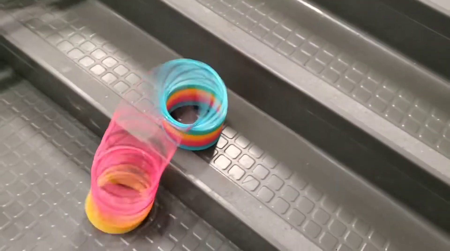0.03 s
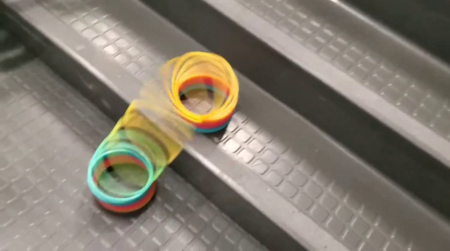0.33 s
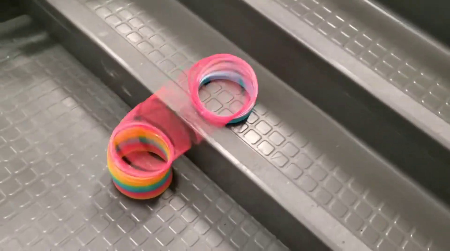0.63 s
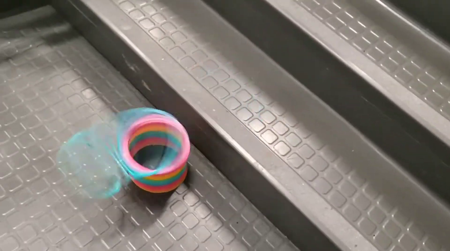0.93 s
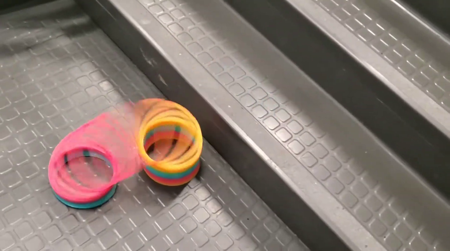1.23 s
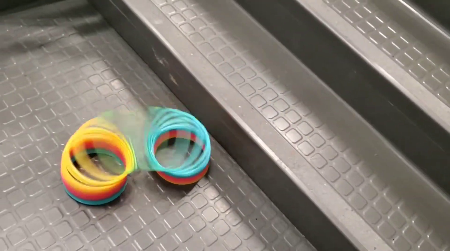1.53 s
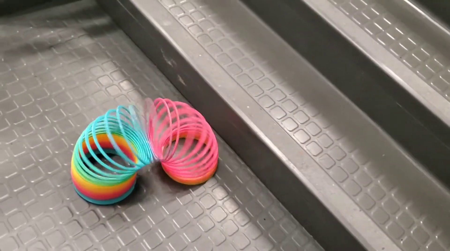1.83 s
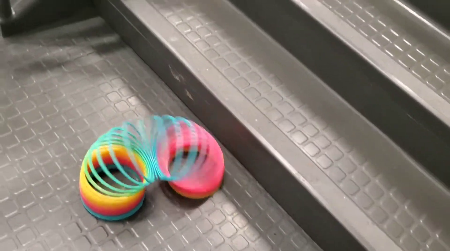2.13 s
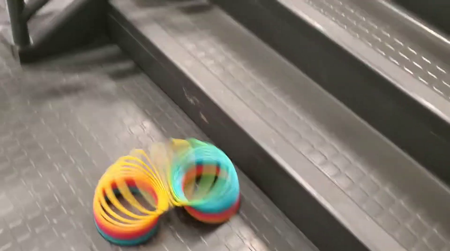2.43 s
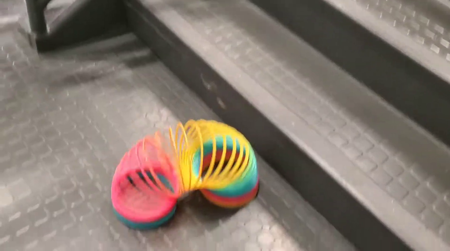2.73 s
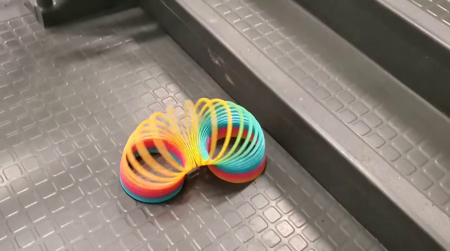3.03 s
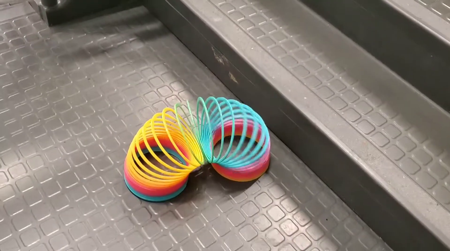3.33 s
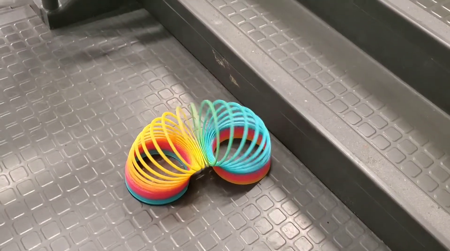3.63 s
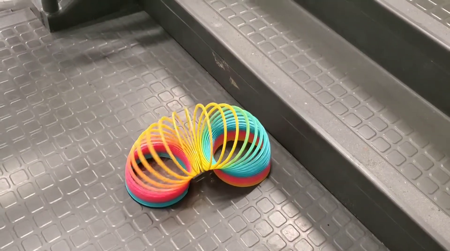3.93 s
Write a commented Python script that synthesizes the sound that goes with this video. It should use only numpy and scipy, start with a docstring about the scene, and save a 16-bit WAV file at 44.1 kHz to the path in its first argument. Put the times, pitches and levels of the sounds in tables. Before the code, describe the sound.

A plastic coil toy flips down hard steps close by, with bright rustling and quick clacks. It slows, gives a sharp knock and shivers twice before resting. The stairwell echoes briefly over a low building rumble.

```python
"""Stairwell: a large plastic coil toy flips down the last hard steps, close by, and rocks to rest.
Its turns peel off one stack with a bright rustle and clack onto the other one by one; lower down the
whole coil rattles, clops and thuds on the treads. A sharp knock, two last shivers. The stairwell rings
briefly over a low building rumble with a faint hum and one soft boom near the end."""
import sys
import numpy as np
from scipy import signal
from scipy.fft import rfft, irfft
from scipy.io import wavfile
from scipy.ndimage import uniform_filter1d, map_coordinates

SR = 44100
rng = np.random.default_rng(int(sys.argv[2]) if len(sys.argv) > 2 else 0)


def bounce(signal):
    """Save signal as a 16-bit WAV file at the path given by the first command-line argument."""
    frames = np.transpose(np.atleast_2d(signal))
    limited = np.clip(frames, -1, 1)
    pcm = np.round(limited * 32767).astype(np.int16)
    wavfile.write(sys.argv[1], SR, pcm)


N = 176400
TIME_S = np.arange(N) / SR


def undb(db):
    """Decibels to gain."""
    return 10 ** (np.asarray(db) / 20)


def unit(x):
    """Scale to rms 1."""
    return x / np.sqrt(np.mean(x ** 2) + 1e-20)


def curve(table, at=TIME_S):
    """Linear interpolation of a two-column table, by default over time."""
    return np.interp(at, *np.array(table).T)


def over_hz(table, size):
    """Interpolate (freq_hz, value) rows onto FFT bins, in log frequency."""
    hz, value = np.array(table).T
    return np.interp(np.log(np.fft.rfftfreq(size, 1 / SR) + 1), np.log(hz), value)


def min_phase(gain_db):
    """Causal, unit-power impulse response from 1025 bin gains."""
    cepstrum = irfft(np.log(unit(undb(gain_db))))
    cepstrum[1:1024] *= 2
    cepstrum[1025:] = 0
    return irfft(np.exp(rfft(cepstrum)))[None]


def colour(x, table):
    """Filter by (freq_hz, gain_db) rows; white input keeps its power."""
    return signal.fftconvolve(x, min_phase(over_hz(table, 2048)), axes=1)[:, :N]


def wander(size, step):
    """Smooth random curve, rms 1, one knot every step points."""
    knots = rng.standard_normal(4096)
    return unit(map_coordinates(knots, [np.arange(size) / step], order=2, mode="mirror"))


def pulse(centre_s, sigma_s):
    """Gaussian envelope, peak 1."""
    return np.exp(-.5 * ((TIME_S - centre_s) / sigma_s) ** 2)


def pan(db):
    """Stereo gains; db is left minus right."""
    return unit(undb(np.array([[db], [-db]]) / 2))


def stereo_noise(size, correlation=.12):
    """White noise, partly shared by left and right."""
    noise = rng.standard_normal((3, size))
    return np.sqrt(correlation) * noise[0] + np.sqrt(1 - correlation) * noise[1:]


def grains(per_s, spread_db):
    """Tiny contacts of unequal size at random moments."""
    happens = rng.random(N) < per_s / SR
    gain = undb(spread_db * np.clip(rng.standard_normal(N), -2, 2))
    return unit(happens * gain * np.tanh(stereo_noise(N)))


def resonance(x, hz, width_hz):
    """Band-pass, gain 1 at the centre."""
    return signal.lfilter(*signal.iirpeak(hz, hz / width_hz, fs=SR), x + 1e-18)


def add(out, start_s, sound):
    """Mix a sound in at start_s."""
    i = int(np.clip(round(start_s * SR), 0, N - 1))
    out[:, i:i + sound.shape[1]] += sound[:, :N - i]


def building():
    """Low rumble that swells late, a faint mains hum and one soft boom."""
    # freq_hz, density_db
    spectrum = [(20, -20), (32, -17.5), (45, -2), (63, 0), (85, -5), (120, -11.5), (160, -11.5),
                (250, -14.5), (400, -19.5), (600, -22.5), (950, -31.5), (1700, -32.5), (2300, -36),
                (3500, -38), (6000, -42.5), (10000, -51.5), (15500, -61)]
    # freq_hz, left_right_correlation
    likeness = [(30, .98), (63, .95), (125, .86), (250, .78), (500, .5), (1000, .15), (4000, .05)]
    # time_s, gain_db
    swell = [(0, -1.5), (.9, -1), (1.2, 0), (2, -1.5), (2.7, 0.5), (3.3, 0.5), (3.6, 3), (3.8, 3.5), (4, 2)]
    shared = over_hz(likeness, N)
    noise = rfft(rng.standard_normal((3, N)))
    noise = np.sqrt(shared) * noise[0] + np.sqrt(1 - shared) * noise[1:]
    rumble = unit(irfft(noise * undb(over_hz(spectrum, N)))) * undb(curve(swell) - 40.5)
    boom_hz, hum_hz = 64.3, 119.3
    drift_rad = 1.1 * wander(N, SR / 25)
    boom = np.sin(2 * np.pi * boom_hz * TIME_S + drift_rad) * pulse(centre_s=3.78, sigma_s=.065)
    hum = np.sin(2 * np.pi * hum_hz * TIME_S)
    return rumble + np.sqrt(2) * (undb(-33) * boom + undb(-52.5) * hum)


def slide():
    """Edges of the turns catch and slip in a fluttering rustle."""
    # time_s, level_db
    envelope = [(0, -44), (.045, -43), (.08, -26.5), (.13, -24), (.25, -28), (.295, -30.5), (.325, -26.5),
                (.37, -28), (.415, -31), (.48, -26.5), (.55, -29.5), (.61, -26.5), (.78, -29), (.9, -34),
                (.97, -44), (1.0, -43), (1.075, -44), (1.12, -31), (1.2, -26.5), (1.3, -29), (1.37, -33),
                (1.45, -32.5), (1.55, -42), (1.69, -44), (1.78, -50), (1.9, -59.5), (2.025, -57),
                (2.07, -35), (2.14, -28), (2.22, -36.5), (2.29, -38), (2.335, -47), (2.44, -46),
                (2.53, -63), (2.7, -59), (2.8, -62), (2.898, -61), (2.93, -32.5), (2.965, -32.5),
                (3.012, -39), (3.04, -49), (3.1, -72), (3.555, -83), (3.575, -37), (3.607, -49),
                (3.63, -70), (4, -90)]
    # freq_hz, gain_db
    spectrum = [(500, -35), (1500, -18.5), (2500, -12.5), (3300, -8.5), (4200, -8.5), (5500, -5.5),
                (7500, -7.5), (9600, -4), (12000, -5.5), (14000, -2.5), (15500, -2)]
    flutter_db, flutter_per_s = 2.5, 150
    flutter = unit(undb(flutter_db * wander(N, SR / flutter_per_s)))
    contacts = grains(per_s=5000, spread_db=3.5) * flutter * undb(curve(envelope))
    return colour(contacts, spectrum) * pan(db=3)


def rattle():
    """Heavier jolts shake the whole coil."""
    # time_s, level_db
    envelope = [(0, -45), (.05, -55), (.12, -45), (.27, -41), (.33, -43.5), (.42, -45), (.48, -39),
                (.54, -46), (.63, -38.5), (.8, -45.5), (.92, -47), (.98, -68), (1.08, -60), (1.15, -48),
                (1.27, -40.5), (1.45, -43.5), (1.58, -52.5), (1.7, -42.5), (1.85, -67), (2.02, -67),
                (2.14, -42.5), (2.26, -50), (2.44, -52), (2.6, -59), (2.89, -64), (2.96, -38.5),
                (3.015, -50), (3.06, -72), (3.55, -85), (3.578, -42), (3.61, -47.5), (3.64, -78), (4, -90)]
    # freq_hz, gain_db
    spectrum = [(150, -11), (400, -6.5), (750, 1), (1000, 0), (1600, -1.5), (2500, -1.5), (3400, 4),
                (4300, -1), (5500, -11), (10000, -39)]
    jolts = grains(per_s=900, spread_db=4) * undb(curve(envelope) - 4.5)
    return colour(jolts, spectrum) * pan(db=1.5)


def coil_modes(x, ripple_db=1.3, width_hz=380, step_s=.07):
    """Crowded plastic resonances shift as the coil bends: cross-faded random filters."""
    out = np.zeros((2, N))
    for centre_s in np.arange(0, N / SR + step_s, step_s):
        response = min_phase(ripple_db * wander(1025, width_hz * 2048 / SR))
        fade = np.maximum(1 - abs(TIME_S - centre_s) / step_s, 0)
        near = np.flatnonzero(fade)
        if len(near):
            add(out, near[0] / SR, signal.fftconvolve(x[:, near] * fade[near], response, axes=1))
    return out


def brighten(x, above_hz=10500):
    """The top treble is keener in the flips, duller in the last shivers."""
    # time_s, gain_db
    treble = [(0, 1), (.45, 1), (.6, 1.5), (.8, -1), (1.05, 0), (1.25, 1), (1.65, 1), (1.9, -2.5),
              (2.1, -1.5), (2.5, 0), (2.75, -2), (3.0, -2.5), (3.6, -3.5)]
    top = signal.sosfiltfilt(signal.butter(3, above_hz, "high", fs=SR, output="sos"), x + 1e-18)
    return x + top * (undb(curve(treble)) - 1)


def hollow(x, blend_s=.04):
    """The bent tube of turns rings at three pitches that change with its pose."""
    # start_s, low_hz, middle_hz, high_hz
    poses = [(0, 1270, 1730, 2910), (.23, 1006, 1290, 1800), (.43, 730, 1630, 2410),
             (1.02, 1085, 1340, 1950), (1.52, 880, 1350, 1930), (2.02, 1320, 1680, 2220),
             (2.33, 900, 1130, 1910), (2.88, 985, 1500, 2640)]
    pose = np.searchsorted([row[0] for row in poses[1:]], TIME_S)
    out = x
    for k, (_, *pitches_hz) in enumerate(poses):
        part = x * uniform_filter1d(1. * (pose == k), int(blend_s * SR) + 1)
        out = out + undb(5.5) * sum(resonance(part, hz, width_hz=130) for hz in pitches_hz)
    return out


def clacks(size=1024):
    """Each turn slaps onto the stack in a quick crowd of ticks with its own tint."""
    # peak_s, level_db, pan_db, length_s
    slaps = [(0.02, -33, 2, 0.0011), (0.038, -43, 2, 0.001), (0.0586, -28.5, 2, 0.0019),
             (0.065, -27, 5, 0.0011), (0.076, -22, -1, 0.0029), (0.083, -22.5, 4, 0.0024),
             (0.09, -23.5, 5, 0.0024), (0.151, -18, 4, 0.0026), (0.167, -28, 5, 0.0013),
             (0.178, -24, -1, 0.002), (0.205, -25, 3, 0.0029), (0.221, -23.5, 8, 0.0018),
             (0.24, -20, 5, 0.0035), (0.26, -19.5, 3, 0.0018), (0.278, -28, 2, 0.0017),
             (0.3135, -24, 3, 0.0021), (0.357, -26, 1, 0.002), (0.3922, -33, 1, 0.0024),
             (0.4083, -22.5, -4, 0.002), (0.425, -33, 9, 0.0024), (0.448, -24, 2, 0.0023),
             (0.469, -26, 6, 0.0022), (0.487, -25, 1, 0.0022), (0.5571, -23.5, 5, 0.0022),
             (0.584, -26, 6, 0.001), (0.5994, -22.5, 1, 0.0027), (0.6421, -29, 5, 0.0016),
             (0.679, -29, 4, 0.0013), (0.69, -30, 1, 0.0014), (0.7156, -26, 5, 0.0012),
             (0.74, -25, 4, 0.0019), (0.766, -27, 1, 0.0014), (0.787, -22, 0, 0.0022),
             (0.809, -29, 6, 0.002), (0.815, -25, 2, 0.0013), (0.8607, -21.5, 4, 0.0021),
             (0.874, -25.5, 2, 0.0026), (0.9186, -28.5, 1, 0.0031), (0.946, -36, 5, 0.0024),
             (0.9873, -28.5, 9, 0.0013), (1.04, -39, 2, 0.0026), (1.06, -40, 6, 0.0019),
             (1.082, -32, 5, 0.0011), (1.099, -38, 3, 0.0012), (1.113, -30, 4, 0.0024),
             (1.1245, -25, 9, 0.0016), (1.14, -25.5, 8, 0.0015), (1.177, -25.5, 9, 0.003),
             (1.22, -25, 12, 0.00076), (1.26, -26.5, 0, 0.0009), (1.29, -27, 4, 0.0014),
             (1.344, -26, 7, 0.0011), (1.354, -26, 5, 0.0021), (1.367, -29, 7, 0.0022),
             (1.3944, -33, 8, 0.0014), (1.4062, -26, 5, 0.0012), (1.4174, -27.5, 5, 0.0012),
             (1.4369, -28, 5, 0.0018), (1.471, -29, 6, 0.002), (1.491, -31, 1, 0.0016),
             (1.515, -32, 2, 0.0025), (1.536, -28.5, 10, 0.0024), (1.557, -30, 6, 0.001),
             (1.58, -28.5, 4, 0.0016), (1.59, -38, 7, 0.0025), (1.603, -32, -2, 0.0015),
             (1.623, -31.5, 3, 0.0018), (1.646, -31, 3, 0.0034), (1.6705, -32, 3, 0.002),
             (1.6947, -31, 4, 0.0024), (1.7198, -33, 3, 0.0029), (1.7458, -34, 2, 0.0022),
             (1.7722, -39, 8, 0.0013), (1.788, -45, 2, 0.0012), (1.802, -39, 8, 0.0017),
             (1.8318, -43, 4, 0.0013), (1.946, -52.5, 3, 0.0018), (1.996, -49, 3, 0.0011),
             (2.0335, -43, 12, 0.0011), (2.053, -34, 4, 0.0016), (2.106, -31, 3, 0.002),
             (2.116, -34, 8, 0.0019), (2.1341, -25.5, 0, 0.0015), (2.1425, -18.5, 4, 0.002),
             (2.17, -28, 3, 0.0018), (2.1872, -25, 4, 0.0014), (2.222, -24.5, 4, 0.0015),
             (2.25, -35, 0, 0.0015), (2.262, -33.5, 3, 0.0016), (2.343, -37, 4, 0.0024),
             (2.3605, -42, 3, 0.0013), (2.3704, -36, 2, 0.0022), (2.3965, -34, 2, 0.002),
             (2.4184, -34, 4, 0.0034), (2.4435, -31.5, 2, 0.0019), (2.4665, -34, 7, 0.0024),
             (2.48, -43, 3, 0.0014), (2.488, -37.5, -6, 0.0022), (2.51, -36, 6, 0.0018),
             (2.532, -41, 2, 0.0012), (2.5554, -39, 3, 0.0019), (2.577, -41, 4, 0.0012),
             (2.6023, -39, 0, 0.0013), (2.6272, -41, 6, 0.0018), (2.652, -40.5, 3, 0.0016),
             (2.68, -41.5, 4, 0.0011), (2.709, -44, 2, 0.0013), (2.726, -52, -6, 0.0014),
             (2.7386, -43, 5, 0.00099), (2.8942, -47, 2, 0.0012), (2.908, -29.5, 3, 0.002),
             (2.921, -29.5, 2, 0.0011), (2.933, -33, 3, 0.0012), (2.9419, -26, 7, 0.0016),
             (2.961, -23.5, -2, 0.0018), (2.9803, -25.5, 5, 0.0019), (2.995, -29, 6, 0.00097),
             (3.012, -22, -0.5, 0.0023), (3.566, -39, 10, 0.0013), (3.572, -30.5, -3, 0.0012),
             (3.576, -32, 7, 0.0028), (3.59, -32, 6, 0.0014), (3.605, -29, 1, 0.002)]
    # freq_hz, gain_db
    spectrum = [(200, -32), (700, -19), (1500, -16.5), (2400, -13), (3500, -10), (7000, -5.5), (9700, -4.5),
                (12000, -3.5), (14000, 0), (15500, -1)]
    rise_share, fall_share, grain_db = .48, .46, 5
    tint_db, tint_width_hz, lag_spread_s = 1.5, 1660, .00009
    out, lead_s = np.zeros((2, N)), size / 4 / SR
    t = np.arange(size) / SR - lead_s
    for peak_s, level_db, pan_db, length_s in slaps:
        envelope = np.exp(np.where(t < 0, t / rise_share, -t / fall_share) / length_s)
        ticks = envelope * stereo_noise(size, correlation=.51)
        ticks *= undb(grain_db * rng.standard_normal(size))
        # left and right arrive slightly apart
        ticks[1] = np.roll(ticks[1], round(lag_spread_s * SR * rng.standard_normal()))
        tint = undb(tint_db * wander(size // 2 + 1, tint_width_hz * size / SR))
        ticks = unit(irfft(rfft(ticks) * tint)) * np.sqrt(.0035 * SR / size)
        add(out, peak_s - lead_s, ticks * undb(level_db + 2.3) * pan(pan_db))
    return colour(out, spectrum)


def bumps(size=2048, decay_s=.0041):
    """A stack of turns meets the step with a short clop."""
    # start_s, level_db
    landings = [(.123, -34), (.243, -22), (.263, -29.5), (.447, -37), (.466, -31.5), (.492, -30),
                (.61, -34), (.678, -35), (.778, -33), (.825, -35), (1.164, -34), (1.243, -32.5),
                (2.081, -37.5), (2.961, -27), (2.98, -32), (3.012, -34), (3.577, -36)]
    # freq_hz, gain_db
    spectrum = [(150, -11), (450, -6.5), (700, 1), (1000, -1), (1700, -3.5), (2500, -1.5), (4000, -2),
                (8000, -12), (15000, -39)]
    out, t = np.zeros((2, N)), np.arange(size) / SR
    for start_s, level_db in landings:
        clop = unit(stereo_noise(size) * np.exp(-t / decay_s)) * np.sqrt(.0029 * SR / size)
        add(out, start_s, clop * undb(level_db - 6))
    return colour(out, spectrum) * pan(db=1.5)


def tumbles():
    """Bunched turns land rim on rim in a dense mid-pitched clatter."""
    # centre_s, level_db, sigma_s
    bunches = [(.145, -39, .018), (.255, -36, .012), (0.34, -37, 0.025), (0.624, -41, 0.018),
               (.915, -43, 0.013), (2.122, -36, .022), (2.99, -45, 0.03)]
    # pitch_hz, width_hz, gain_db
    rim_modes = [(2910, 380, -0.5), (3300, 300, 0), (3750, 260, 0.5), (4040, 200, -4), (4650, 250, -8)]
    envelope = sum(undb(db) * pulse(centre_s, sigma_s) for centre_s, db, sigma_s in bunches)
    hits = grains(per_s=700, spread_db=3.5)
    rims = sum(undb(db) * resonance(hits, hz, width_hz) for hz, width_hz, db in rim_modes)
    return unit(rims) * envelope * pan(db=1.5)


def thuds(pitch_hz=223, width_hz=122):
    """The coil's weight settles on the tread with soft low thuds."""
    # centre_s, level_db
    settlings = [(.15, -50), (1.64, -54.5), (2.16, -47), (2.28, -53)]
    envelope = sum(undb(db) * pulse(centre_s, sigma_s=.055) for centre_s, db in settlings)
    tread = resonance(rng.standard_normal(N), pitch_hz, width_hz)
    return envelope * unit(resonance(tread, pitch_hz, width_hz))


def knocks(size=4096):
    """Hard plastic knocks ring a few short modes."""
    # pitch_hz, level_db, t60_s
    modes = [(1300, -41, 0.02), (1830, -38, 0.014), (2900, -33, 0.012), (3580, -29, .009),
             (3770, -23, 0.016), (4090, -27, 0.01), (8630, -28, 0.009), (12000, -24.5, 0.0034),
             (14600, -28, .003)]
    # start_s, gain_db
    strikes = [(1.037, -13.5), (2.3005, -0.5), (2.3075, -15)]
    out, t = np.zeros((2, N)), np.arange(size) / SR
    ring = sum(undb(db - 60 * t / t60_s) * np.sin(2 * np.pi * hz * t) for hz, db, t60_s in modes)
    for start_s, gain_db in strikes:
        add(out, start_s, ring * undb(gain_db + 1) * pan(db=6))
    return out


def stairwell(x, size=32768, tail_rise_s=.0036, echo_decay_s=.007):
    """Quick echoes off the steps, then a tail whose treble dies first."""
    # freq_hz, t60_s
    tail_decay = [(300, 1.7), (850, .8), (1500, .5), (4000, .5), (9000, 0.35), (15000, 0.21)]
    # freq_hz, level_db
    tail_level = [(300, -5.5), (1500, -2), (4000, -6), (9000, -7.5), (15000, -10)]
    t, hz = np.arange(size) / SR, np.fft.rfftfreq(size, 1 / SR)
    noise, tail = rfft(rng.standard_normal((2, size))), 0
    edges_hz = np.geomspace(100, SR / 2, 13)
    for low_hz, high_hz in zip(edges_hz, edges_hz[1:]):
        centre_hz = np.sqrt(low_hz * high_hz)
        band = irfft(noise * ((hz >= low_hz) & (hz < high_hz)))
        fade = undb(-60 * t / curve(tail_decay, centre_hz)) * (1 - np.exp(-t / tail_rise_s))
        tail = tail + band * unit(fade) * undb(curve(tail_level, centre_hz))
    spikes = rng.standard_normal((2, size)) ** 3
    echoes = unit(spikes * np.exp(-t / echo_decay_s) * (t > .001))
    return signal.fftconvolve(x, (tail + undb(-4.5) * echoes) / np.sqrt(size), axes=1)[:, :N]


def scene():
    """Toy and drier knocks in the stairwell, over the rumble."""
    turns = brighten(coil_modes(clacks() + slide()))
    toy = turns + hollow(rattle() + bumps()) + tumbles() + thuds()
    hits = knocks()
    return toy + hits + stairwell(toy + undb(-10) * hits) + building()


def record(dry, cutoff_hz=15900):
    """Steep low-pass."""
    return signal.sosfilt(signal.ellip(12, .2, 80, cutoff_hz, fs=SR, output="sos"), dry)


dry = scene()
out = record(dry)
bounce(out)
```